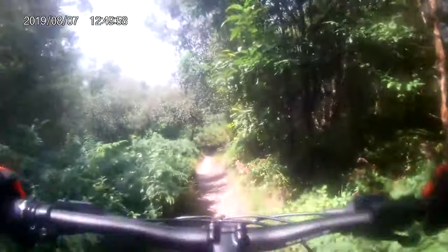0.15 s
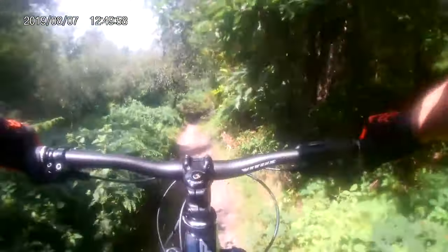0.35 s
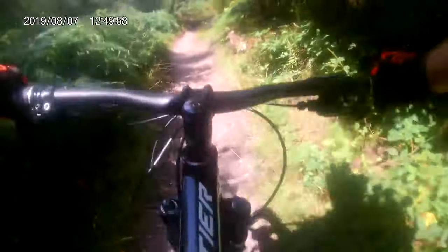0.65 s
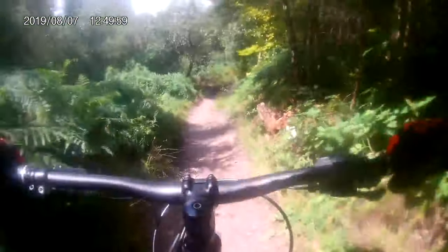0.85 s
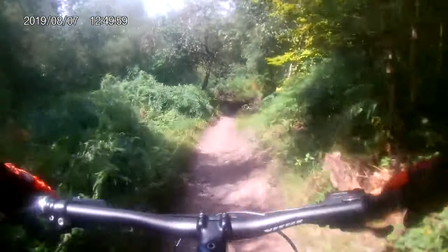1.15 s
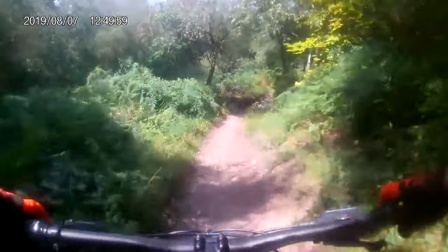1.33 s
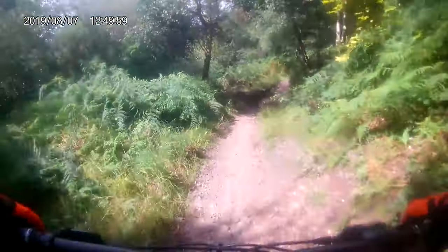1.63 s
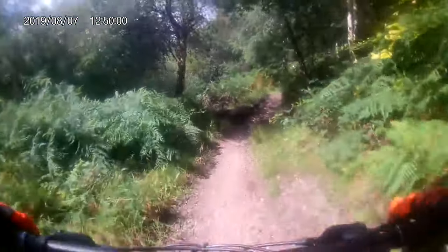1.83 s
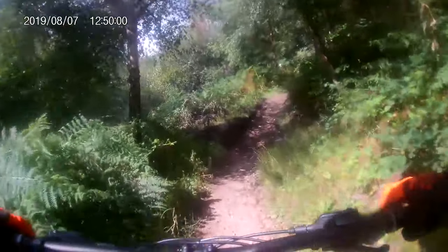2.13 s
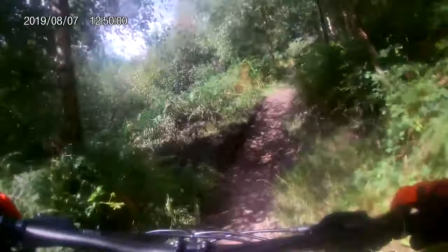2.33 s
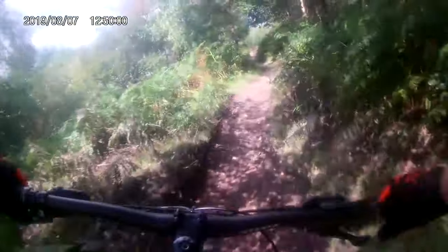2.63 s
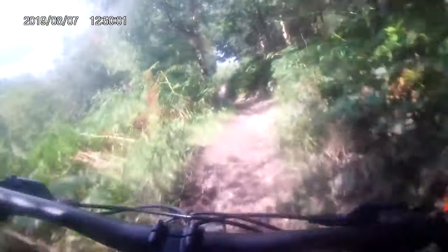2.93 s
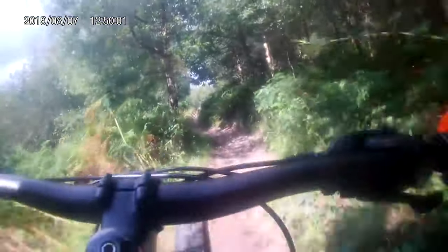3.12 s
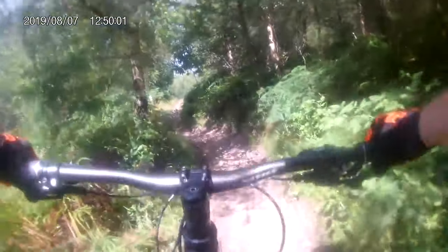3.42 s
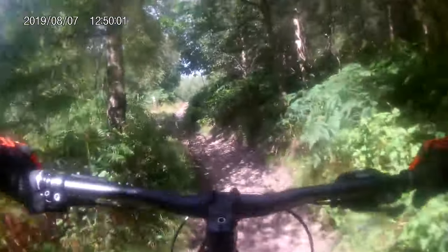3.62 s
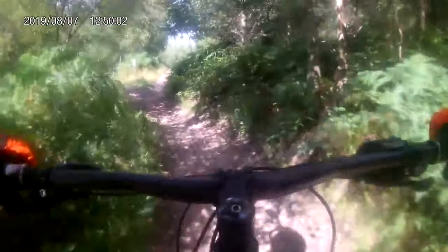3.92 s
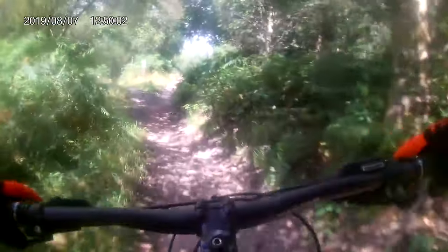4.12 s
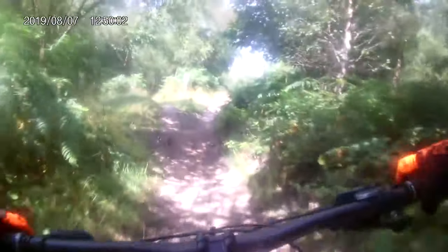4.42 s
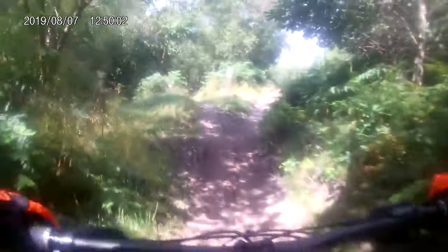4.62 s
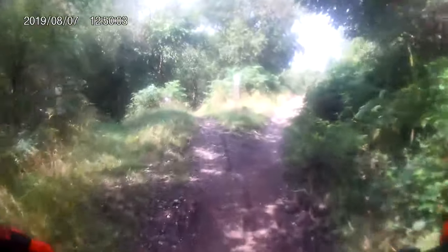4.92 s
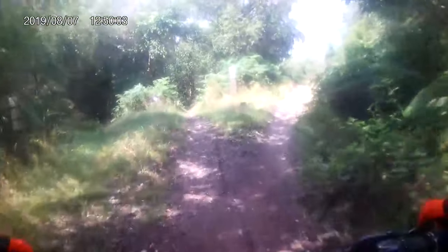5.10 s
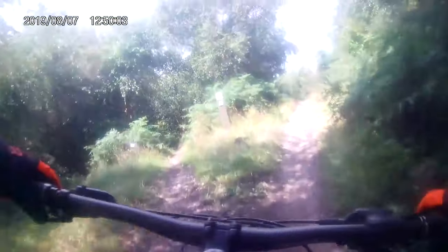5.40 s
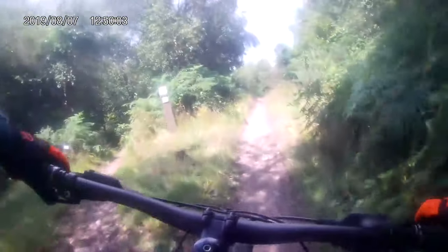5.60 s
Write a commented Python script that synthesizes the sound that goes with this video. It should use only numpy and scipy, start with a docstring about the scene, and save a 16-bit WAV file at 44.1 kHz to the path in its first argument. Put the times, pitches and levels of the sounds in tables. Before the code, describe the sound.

Hollow knocks and plastic clicks clatter as a bicycle rides over bumpy ground, with gritty tyre crunch, rubbing straps and light wind.

```python
"""Mountain bike on a rough dirt trail

A small camera strapped to the rider's chest hears the ride. At each bump it knocks and ticks in
its mount, often bouncing. Tyres crunch, the harness rubs and thuds, and wind rumbles over a faint
hiss. Knocks, ticks and crunch make the camera's closed housing ring, so they sound hollow."""
import sys
import numpy as np
from scipy import signal
from scipy.fft import rfft, irfft, next_fast_len
from scipy.io import wavfile

SR = 44100
rng = np.random.default_rng(int(sys.argv[2]) if len(sys.argv) > 2 else 0)


def log_audio(samples):
    """Write samples as a 16-bit WAV file to the path given in sys.argv[1]."""
    # one column per channel
    frames = np.atleast_2d(samples).T
    # limit to full scale, then quantise
    limited = np.clip(frames, -1, 1)
    pcm = np.round(limited * 32767).astype(np.int16)
    wavfile.write(sys.argv[1], SR, pcm)


N = 253575
TIME = np.arange(N) / SR
COARSE_TIME = TIME[::64]  # enough for smooth changes in loudness
RING_SAMPLES = 2048  # room for one hit to die away


def gain_of(db):
    """Turns decibels into a number to multiply by."""
    return 10 ** (np.asarray(db) / 20)


def evened(x):
    """Scales a sound to an average strength (rms) of 1."""
    return x / np.sqrt(np.mean(x ** 2) + 1e-20)


def coloured(x, points):
    """Shapes the lows and highs of a sound along (frequency [Hz], level [dB]) points."""
    hz, db = np.transpose(points)
    size = next_fast_len(len(x))
    freqs = np.fft.rfftfreq(size, 1 / SR)
    curve = gain_of(np.interp(np.log(freqs + 1), np.log(hz), db))
    return evened(irfft(rfft(x, size) * curve, size)[:len(x)])


def level(rows, column):
    """A gain that glides through one column of a timed table."""
    columns = np.transpose(rows)
    return gain_of(np.interp(TIME, columns[0], columns[column]))


def lumps(hz, depth_db):
    """A gain that wanders at random; more hz means faster."""
    slow = signal.sosfiltfilt(signal.butter(1, hz, fs=SR, output="sos"), rng.standard_normal(N))
    return evened(gain_of(depth_db * evened(slow)))


def grains(per_s, spread_db):
    """Clicks of uneven size at random times."""
    size = gain_of(spread_db * np.minimum(rng.exponential(1, N), 4)) * rng.choice([-1., 1.], N)
    return evened(size * (rng.random(N) < per_s / SR))


# Tone of the hiss: (frequency [Hz], relative level [dB])
HISS_TONE = [(100, 17.5), (300, 12), (2300, -47), (2900, -8), (5500, -4.5), (7000, -8.5), (8000, -16),
             (8600, -10.5), (12000, -11.5)]

def hiss(level_db=-61.5):
    """Faint, steady noise behind everything."""
    return gain_of(level_db) * coloured(rng.standard_normal(N), HISS_TONE)


# How the wind rises and falls: (time [s], level [dB])
WIND_GUSTS = [(0.0, -75), (0.22, -66), (0.43, -50), (0.74, -42), (0.86, -57), (1.15, -65), (1.76, -60),
              (1.98, -55), (2.4, -68), (2.96, -60), (3.65, -68), (4.05, -63), (4.45, -57), (4.56, -57),
              (5.14, -55.5), (5.75, -74)]

def wind():
    """Air buffets the microphone opening with a lumpy, low rumble."""
    tone = [(12, -52), (25, 17), (60, -3.5), (120, -8.5), (300, -38), (900, -89)]
    rumble = coloured(rng.standard_normal(N), tone)
    return level(WIND_GUSTS, column=1) * rumble * lumps(hz=9, depth_db=3.5)


# Low thuds: (time [s], level [dB], pitch [Hz])
CHEST_THUDS = [(1.74, -44, 35), (2.14, -43.5, 35.8), (2.881, -33, 85), (3.083, -35, 50.4), (4.556, -41, 45),
               (4.924, -45, 33.8), (5.07, -42, 100), (5.145, -45, 33)]

def thuds():
    """The harness swings against the chest: two soft, uneven vibrations each time."""
    out = np.zeros(N)
    for start, db, hz in CHEST_THUDS:
        turns = np.clip((TIME - start) * hz, 0, 2)
        out += gain_of(db) * np.sin(2 * np.pi * turns) * np.sin(np.pi * turns / 2)
    return out * lumps(hz=80, depth_db=2.0)


# Course of the shudder: (time [s], pitch [Hz], level [dB])
MOUNT_SHUDDER = [(0.683, 141, -33), (.70, 127.8, -37), (0.736, 148.7, -28.5), (0.754, 95.6, -36),
                 (0.774, 72, -19), (0.782, 41, -24.5), (0.799, 44.4, -16)]

def shudder():
    """After the hardest landing the mount wobbles, swelling as it slows, then stops."""
    times, hz, db = np.transpose(MOUNT_SHUDDER)
    started = TIME >= times[0]
    turns = np.cumsum(np.interp(TIME, times, hz) * started) / SR
    fade_out = np.clip((times[-1] - TIME) / 0.006, 0, 1)
    loudness = gain_of(np.interp(TIME, times, db)) * started * fade_out
    return -lumps(hz=70, depth_db=2.1) * loudness * np.sin(2 * np.pi * turns)


# Short scrapes: (middle time [s], half length [s], crunch [dB], rubbing [dB], swish [dB])
LURCH_SCRAPES = [(0.228, 0.028, -47, -44.5, -69), (0.291, 0.066, -49, -39.5, -54),
                 (0.508, 0.0066, -58, -36, -65), (0.556, 0.008, -51, -45, -48),
                 (0.701, 0.018, -35, -35, -63), (1.442, 0.055, -48, -43, -59),
                 (1.595, 0.079, -44.5, -50.5, -74), (1.847, 0.023, -43.5, -63, -73),
                 (2.88, 0.045, -48.5, -46, -63), (3.002, 0.059, -49, -54, -76),
                 (3.215, 0.016, -48, -40.5, -67), (3.292, 0.013, -45, -43, -58),
                 (3.433, 0.013, -49, -43.5, -62), (3.5, 0.034, -53, -44, -73),
                 (3.56, 0.046, -52, -50.5, -60), (3.672, 0.053, -58, -50, -55),
                 (4.426, 0.016, -54, -48.5, -56), (4.783, 0.014, -47, -51.5, -71),
                 (5.036, 0.023, -59, -49.5, -76)]

def scrapes(column):
    """The bike lurches: one smooth rise and fall in loudness for each scrape."""
    columns = np.transpose(LURCH_SCRAPES)
    middle, half_length = columns[:2]
    return gain_of(columns[column]) * np.exp(-((COARSE_TIME[:, None] - middle) / half_length) ** 2)


# Tone of the sliding cloth: (frequency [Hz], relative level [dB])
SWISH_TONE = [(2800, -32), (3900, -6), (4800, 5), (5500, -9), (7000, -42)]

def swish():
    """Cloth slides on the housing with a thin, raspy hiss during each scrape."""
    swell = np.interp(TIME, COARSE_TIME, np.linalg.norm(scrapes(column=4), axis=1))
    rasp = rng.standard_normal(N) * lumps(hz=90, depth_db=4.3)
    return swell * coloured(rasp, SWISH_TONE)


# Slow changes along the trail: (time [s], tyre crunch [dB], harness rubbing [dB])
RIDE_LEVELS = [(0.0, -77.5, -61), (0.21, -68, -59.5), (0.4, -67, -47.5), (0.59, -54, -46.5),
               (1.04, -60, -53.5), (1.3, -60.5, -59.5), (1.54, -58, -50), (1.68, -52, -52.5),
               (2.1, -46, -54), (2.27, -48, -56.5), (2.64, -55.5, -58.5), (2.87, -68, -63),
               (3.07, -52, -48.5), (3.52, -71, -66), (4.23, -56.5, -56), (4.58, -49.5, -53),
               (4.84, -48.5, -55.5), (5.75, -63, -63.5)]

def ride_loudness(column, jolt_db, rise_s=0.013, fall_s=0.022):
    """Gain of tyres or straps: a slow level, the scrapes, and a jolt as each knock loads them."""
    times, knock_db = np.transpose(MOUNT_KNOCKS)[:2]
    since = COARSE_TIME[:, None] - times
    jolts = gain_of(knock_db + jolt_db) * np.exp(-np.maximum(since / fall_s, -since / rise_s) ** 1.13)
    swells = np.linalg.norm(np.hstack([jolts, scrapes(column + 1)]), axis=1)
    return np.hypot(level(RIDE_LEVELS, column), np.interp(TIME, COARSE_TIME, swells))


# Tone of rubbing: (frequency [Hz], relative level [dB])
RUB_TONE = [(100, 0.5), (250, -0.5), (900, -3.5), (1300, -1), (2200, -4.5), (2900, -20), (4800, -15),
            (6200, -24), (7000, -33.5), (12000, -37)]

def harness(loose_db=-23):
    """Straps and cloth drag over the mount in clumps of tiny clicks; loose parts tick along."""
    drag = 0.73 * grains(per_s=1400, spread_db=4.0) + 0.59 * rng.standard_normal(N)
    snap = coloured(rng.standard_normal(N), SNAP_TONE)
    tick_fade = np.exp(-np.arange(400) / SR / 0.0016)
    loose_ticks = snap * signal.oaconvolve(abs(grains(per_s=19, spread_db=-3)), tick_fade)[:N]
    rubbing = coloured(drag * lumps(hz=94, depth_db=2.4), RUB_TONE)
    return ride_loudness(column=2, jolt_db=-20) * (rubbing + gain_of(loose_db) * evened(loose_ticks))


def housing_note(hz, width, db):
    """One note of the housing builds up, then dies; a wider note dies sooner."""
    t = np.arange(RING_SAMPLES) / SR
    return gain_of(db) * width ** 2 * t * np.exp(-np.pi * width * t) * np.sin(2 * np.pi * hz * t)


# Notes the closed housing rings at: (pitch [Hz], width [Hz], relative level [dB])
HOUSING_NOTES = [(995, 120, -8), (1320, 190, 0), (1700, 150, -6.5), (2045, 120, -5), (2610, 140, -22),
                 (5000, 1300, -33)]

def housing(clicks):
    """Each click rings all the housing's notes at once."""
    ring = sum(housing_note(*row) for row in HOUSING_NOTES)
    return signal.oaconvolve(clicks, ring / np.linalg.norm(ring))[:N]


def tyres():
    """Grit under the tyres shakes the housing; each note swells and sinks on its own."""
    grit = 0.9 * grains(per_s=300, spread_db=2.8) + rng.standard_normal(N)
    grit *= lumps(hz=22, depth_db=2.8)
    crunch = sum(signal.oaconvolve(grit * lumps(hz=25, depth_db=1.9), housing_note(*row))[:N]
                 for row in HOUSING_NOTES)
    return ride_loudness(column=1, jolt_db=-35) * evened(crunch)


def hits(rows, shape, early_s, housing_db):
    """Plays one hit per row and lets it ring the housing; shape gets the row's last two values."""
    out, clicks = np.zeros(N + RING_SAMPLES), np.zeros(N)
    t = np.arange(RING_SAMPLES) / SR
    for time, db, *settings in rows:
        start = round((time - early_s) * SR)
        span = slice(start, start + RING_SAMPLES)
        out[span] += gain_of(db) * shape(t, span, *settings)
        clicks[start] = gain_of(db)
    return out[:N] + gain_of(housing_db) * housing(clicks)


# Tones of a tick's snap and of its thin, high sheen: (frequency [Hz], relative level [dB])
SNAP_TONE = [(2300, -5), (3300, 2.5), (4900, 2), (5900, 2), (6900, -11.5), (7500, -9.5), (8000, -73)]
SHEEN_TONE = [(7900, -15), (8600, 5), (11500, 1)]
# Sharp ticks: (time [s], relative level [dB], pitch [Hz], relative sheen [dB])
PLASTIC_TICKS = [(0.013, -41.5, 4370, -23), (0.0351, -32.5, 5960, -16.5), (0.08, -42, 4460, -29),
                 (0.1113, -32, 4870, -38), (0.2035, -41, 4400, -29), (0.2223, -28.5, 5210, -29),
                 (0.2712, -31.5, 4800, -25), (0.2747, -33.5, 3860, -19), (0.3373, -28, 3640, -26),
                 (0.371, -28.5, 5260, -20), (0.3766, -26.5, 4960, -24), (0.4258, -31, 4700, -20),
                 (0.4304, -30, 5030, -40), (0.4362, -33, 4530, -25), (0.4416, -37, 5420, -18.5),
                 (0.5034, -29.5, 4900, -25), (0.5088, -35, 4730, -23), (0.5157, -34, 4750, -22),
                 (0.5599, -37, 4960, -28), (0.6392, -22.5, 4670, -44), (0.6925, -34.5, 4960, -25),
                 (0.7165, -40, 4800, -11), (0.7527, -19.5, 5130, -23), (0.7593, -25, 5080, -29),
                 (0.872, -37.5, 3500, -17), (0.889, -26.5, 4870, -15.5), (0.8991, -38, 5000, -29),
                 (0.977, -35, 6450, -19), (1.1863, -25, 5350, -23), (1.3012, -43, 5130, -30),
                 (1.6227, -35, 5310, -25), (1.6317, -37.5, 5100, -23), (1.7744, -34, 5270, -27),
                 (1.9274, -46, 4250, -35), (2.1309, -27, 4820, -20.5), (2.2262, -33, 5100, -27),
                 (2.2841, -41, 4900, -27), (2.4432, -37, 5170, -29), (2.6659, -41.5, 5060, -30),
                 (2.812, -49, 3800, -25), (2.8706, -47, 4350, -36), (2.8818, -32.5, 4900, -16.5),
                 (2.992, -45, 3420, -32), (3.0274, -31.5, 5050, -25), (3.0359, -37, 4700, -15),
                 (3.1502, -34, 4800, -35), (3.1543, -36.5, 4700, -23), (3.1595, -40, 4740, -22),
                 (3.2078, -38, 4100, -14), (3.2471, -32.5, 5120, -23.5), (3.3114, -31, 4930, -21),
                 (3.3194, -39, 4930, -21), (3.399, -35, 5730, -14), (3.4225, -38, 3900, -23),
                 (3.4246, -28.5, 3500, -32), (3.431, -33, 4560, -20), (3.4372, -42, 5300, -18),
                 (3.4838, -34, 4740, -18), (3.4956, -31, 5200, -22), (3.5064, -39, 4620, -23),
                 (3.525, -39.5, 4200, -30), (3.5837, -28.5, 4650, -20.5), (3.7477, -21, 5050, -23.5),
                 (3.7532, -30.5, 4830, -41), (3.8248, -26.5, 5070, -21.5), (3.8306, -41, 4660, -30),
                 (3.8343, -31, 5100, -26), (3.9287, -38.5, 3720, -29), (3.9509, -44, 4430, -24),
                 (3.9776, -30, 5280, -22.5), (4.3829, -29, 6370, -12.5), (4.5712, -35.5, 4440, -26),
                 (4.5778, -38, 6000, -21), (4.6087, -36, 5100, -26), (4.848, -43, 3220, -30),
                 (5.1064, -42, 3320, -31), (5.137, -45, 4580, -30), (5.177, -47, 4600, -30),
                 (5.2158, -38.5, 5200, -33), (5.2243, -37, 4500, -25), (5.4772, -35, 5110, -37),
                 (5.4809, -35, 3470, -24)]

def ticks():
    """The plastic housing ticks: a short, high ring in a snap of noise, with a faint tail."""
    snap = coloured(rng.standard_normal(N + RING_SAMPLES), SNAP_TONE)
    sheen = coloured(rng.standard_normal(N + RING_SAMPLES), SHEEN_TONE)

    def tick(t, span, hz, sheen_db):
        rise = 1 - np.exp(-(t / 0.0004) ** 2)
        ring = np.sin(2 * np.pi * hz * t) * np.exp(-t / 0.001)
        fade = gain_of(-4.0) * np.exp(-t / 0.0014) + gain_of(-22.5) * np.exp(-(t / 0.016) ** 2)
        noise = snap[span] + gain_of(sheen_db + 11.5) * sheen[span]
        return rise * (gain_of(3.5) * ring + fade * noise)
    return hits(PLASTIC_TICKS, tick, early_s=0.00047, housing_db=4.5)


# Dull blows through the mount: (time [s], relative level [dB], pitch [Hz], fade time [ms])
MOUNT_KNOCKS = [(0.0353, -38, 367, 0.35), (0.112, -32.5, 780, 0.89), (0.1151, -40, 610, 7.3),
                (0.2022, -28.5, 1240, 0.46), (0.271, -20.5, 398, 0.26), (0.2769, -20.5, 730, 0.55),
                (0.2797, -30, 900, 0.26), (0.2827, -26, 900, 0.53), (0.285, -25, 900, 0.54),
                (0.333, -27.5, 594, 0.29), (0.341, -27.5, 900, 0.4), (0.362, -27, 900, 0.57),
                (0.3707, -29, 570, 0.21), (0.3767, -26, 470, 0.32), (0.4259, -25, 1020, 0.23),
                (0.4315, -28.5, 880, 2.7), (0.4426, -28, 634, 0.41), (0.554, -27.5, 910, 0.6),
                (0.5618, -28, 710, 0.52), (0.5694, -27, 825, 1.1), (0.579, -29, 563, 0.86),
                (0.626, -26.5, 330, 1.2), (0.629, -39, 380, 5.2), (0.6389, -13.5, 844, 1.4),
                (0.639, -24.5, 2730, 1.8), (0.7155, -21.5, 1050, 0.92), (0.7521, -19.5, 765, 1.4),
                (0.7583, -24.5, 1720, 4.6), (0.7657, -21.5, 920, 1.2), (0.8883, -29.5, 448, 0.95),
                (0.8908, -25, 1140, 0.76), (0.8942, -30.5, 1660, 2.5), (1.01, -32.5, 1340, 4.1),
                (1.038, -36, 2100, 3.7), (1.0422, -31, 935, 0.61), (1.1863, -31, 560, 5.4),
                (1.1946, -40, 560, 2.4), (1.2994, -30, 1370, 0.17), (1.307, -36, 1690, 0.3),
                (1.8586, -34, 1710, 4.8), (1.9276, -28.5, 1380, 3.9), (2.1359, -26.5, 1260, 0.19),
                (2.224, -37, 1400, 1.1), (2.289, -32.5, 910, 1), (2.357, -36, 1410, 4.8),
                (2.6645, -29.5, 960, 0.81), (2.8709, -20.5, 840, 2.1), (2.871, -29, 2130, 1.5),
                (2.9917, -29, 1070, 0.45), (2.9966, -38, 865, 3), (3.027, -31.5, 1440, 0.58),
                (3.1105, -25.5, 1280, 0.5), (3.1501, -37, 646, 6.5), (3.159, -27.5, 860, 0.86),
                (3.2129, -34.5, 372, 5.1), (3.312, -31, 850, 2.4), (3.316, -34.5, 1720, 4.6),
                (3.3906, -23, 800, 0.51), (3.3983, -24, 770, 0.48), (3.4024, -28, 700, 0.62),
                (3.4955, -32, 534, 2.6), (3.508, -33.5, 626, 3.3), (3.587, -34.5, 1490, 1.9),
                (3.7469, -29, 750, 0.14), (3.755, -31.5, 620, 3.1), (3.8249, -26.5, 725, 2.6),
                (3.8288, -25.5, 1370, 0.62), (3.8368, -34, 1320, 2.2), (3.8898, -33, 1800, 2),
                (3.906, -38, 1510, 2.3), (3.9527, -38, 665, 1.6), (3.9769, -33.5, 1200, 0.33),
                (4.056, -33.5, 930, 0.4), (4.064, -31, 1080, 0.63), (4.354, -36, 1360, 1.1),
                (4.3818, -35.5, 750, 0.18), (4.4513, -25.5, 1530, 0.34), (4.4576, -33, 1080, 1.2),
                (4.6083, -28.5, 770, 0.41), (4.6125, -29, 755, 0.82), (4.69, -36.5, 1640, 4),
                (4.729, -40, 1350, 6.7), (4.779, -40.5, 1320, 2.5), (5.04, -42, 810, 3.4),
                (5.106, -32.5, 979, 3), (5.2258, -35.5, 420, 0.82), (5.3927, -29.5, 1360, 0.16),
                (5.397, -31.5, 1380, 1.1), (5.4848, -36.5, 660, 0.14)]

def knocks():
    """A bump pushes the microphone's membrane, with a hollow ring and a scuffing tail."""
    scuff = coloured(rng.standard_normal(N + RING_SAMPLES), RUB_TONE)

    def knock(t, span, hz, fade_ms):
        # low, short knocks are mostly push
        dullness = np.clip(1.6 - hz / 1100, 0, 1) * np.exp(-fade_ms / 1.06)
        push = -np.exp(-((t - 0.0005) / 0.00015) ** 2)
        spring_back = 0.16 * t / 0.00093 * np.exp(1 - t / 0.0014)
        ring = -np.sin(2 * np.pi * hz * t) * np.exp(-1000 * t / fade_ms) * (1 - np.exp(-t / 0.00023))
        tail = scuff[span] * np.exp(-(t / 0.0057) ** 2) * (1 - np.exp(-t / 0.000071))
        thump = gain_of(8.5) * dullness * (push + spring_back)
        return thump + gain_of(2.5) * ring + gain_of(-7.5 - 8.3 * dullness) * tail
    return hits(MOUNT_KNOCKS, knock, early_s=0.00039, housing_db=-4.0)


def scene():
    """All the sounds meet at one microphone."""
    return (hiss() + knocks() + ticks() + tyres() + harness() + swish() + wind() + shudder()
            + thuds())[None]


def record(dry, cutoff_hz=12350):
    """Cuts away the highest treble."""
    lowpass = signal.firwin(511, cutoff_hz, window=("kaiser", 9), fs=SR)
    return signal.oaconvolve(dry, lowpass[None], "same")


dry = scene()
out = record(dry)
log_audio(out)
```